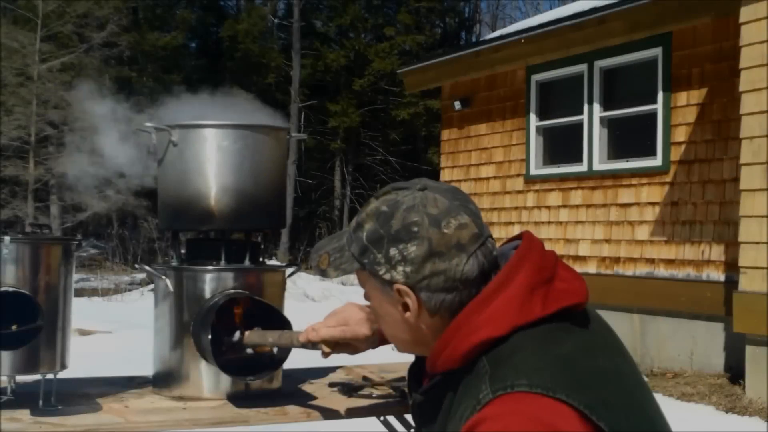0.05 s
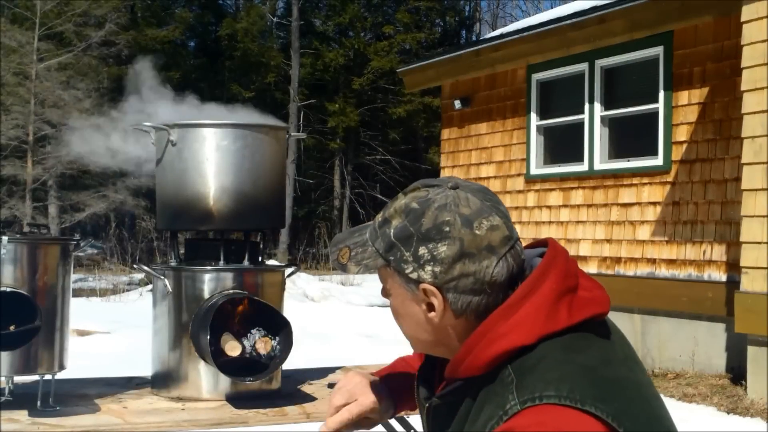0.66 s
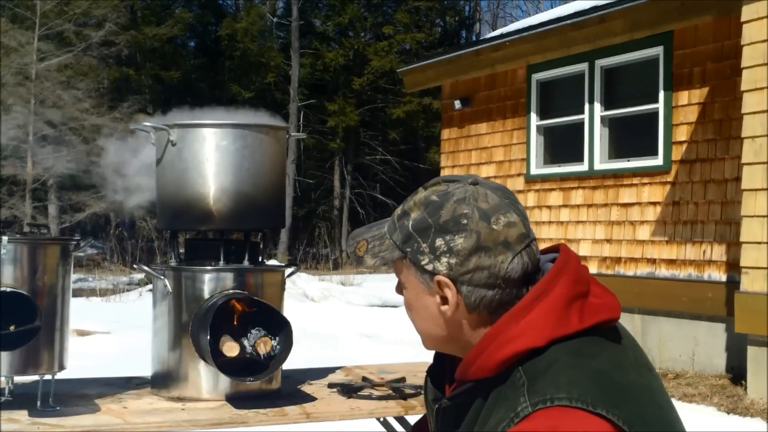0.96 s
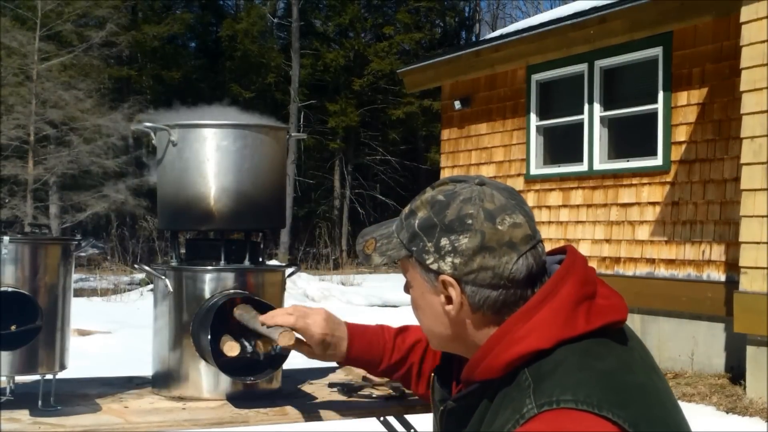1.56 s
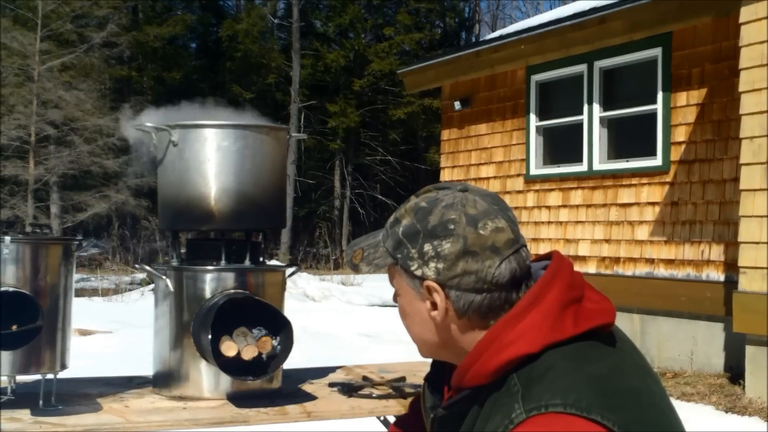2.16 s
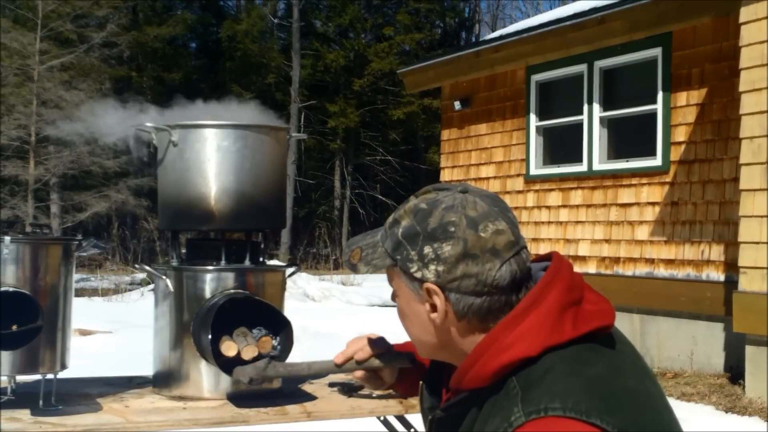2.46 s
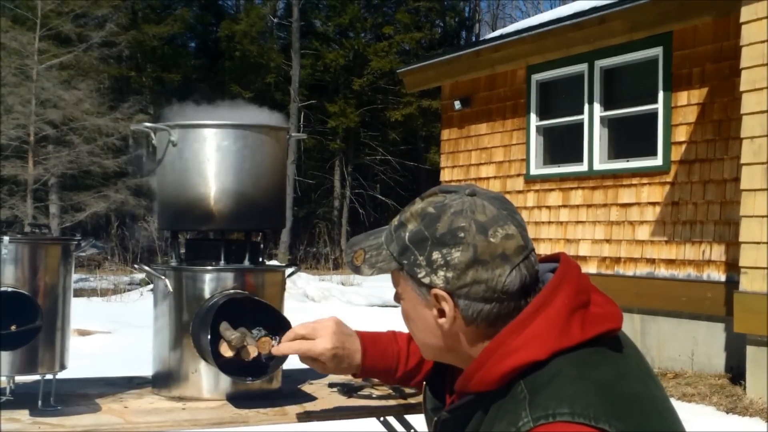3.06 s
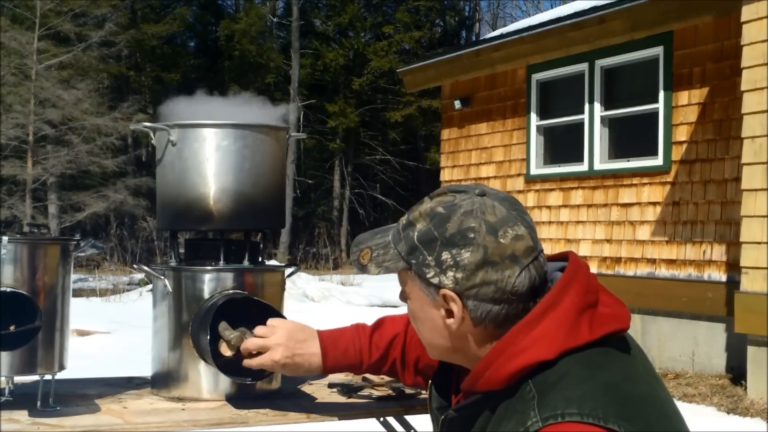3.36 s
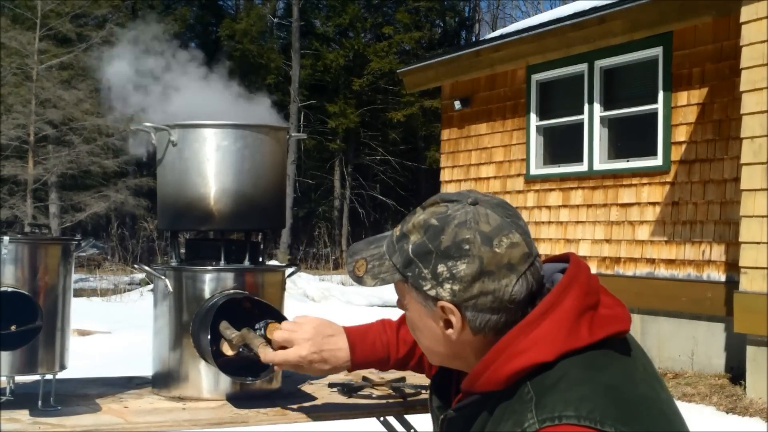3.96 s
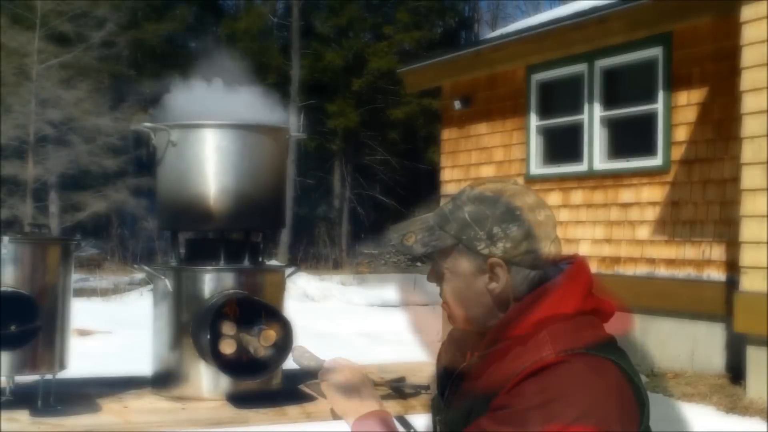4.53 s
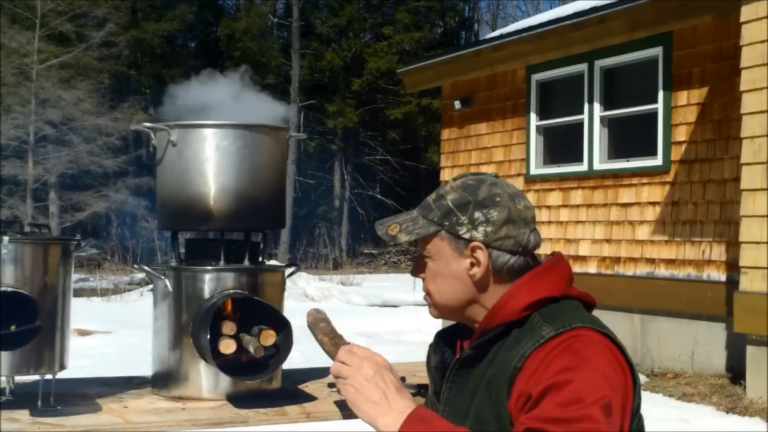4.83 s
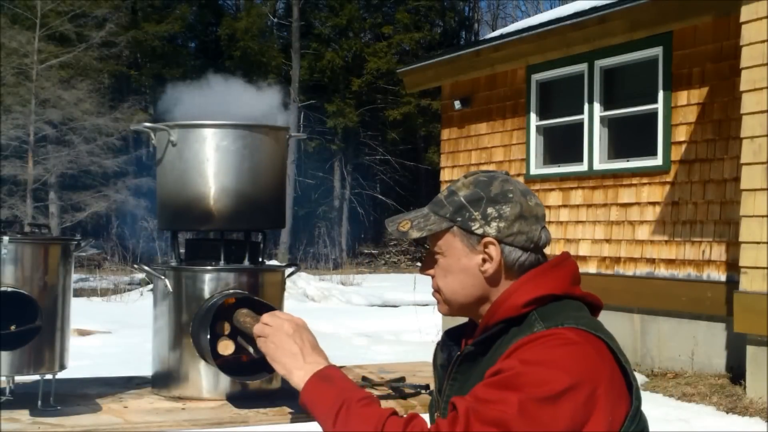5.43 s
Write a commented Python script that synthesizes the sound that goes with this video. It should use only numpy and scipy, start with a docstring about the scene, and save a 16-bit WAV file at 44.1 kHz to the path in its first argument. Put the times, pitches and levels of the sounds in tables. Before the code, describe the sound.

Sticks knock and scrape into a steel stove outdoors while the fire snaps and hisses, with faint bird chirps and wind on the microphone.

```python
"""Feeding a wood stove outdoors

Sticks knock and scrape into the stove's steel mouth: bark crunches, wood thuds, the feed tube rings.
Gas pockets snap in the fire and echo off a house wall; damp wood hisses and ticks over the draught.
A small bird gives thin, high calls among the trees, and gusts buffet the microphone."""
import sys
import numpy as np
from scipy import signal
from scipy.fft import rfft, irfft
from scipy.io import wavfile
from scipy.ndimage import uniform_filter1d

SR = 44100
rng = np.random.default_rng(int(sys.argv[2]) if len(sys.argv) > 2 else 0)


def dump_mix(stems):
    """Bounce the given channels to the path in sys.argv[1] as a 16-bit WAV at rate SR."""
    frames = np.atleast_2d(stems).T  # one column per channel
    limited = np.clip(frames, -1, 1)  # hard clip at full scale
    pcm = np.round(limited * 32767).astype(np.int16)
    wavfile.write(sys.argv[1], SR, pcm)


N = 250876
T = np.arange(N) / SR
# tone of crushed or rubbed bark: f/Hz, relative level/dB
BARK_SPECTRUM = [(150, -1), (400, -31), (1000, -8), (2800, -4), (5000, 2.5), (8000, 8.5), (11500, 4.5),
                 (16000, -11)]


def knocks(rise_s=0.0015, settle_db=-18, settle_s=0.013, wood_db=-7.5, steel_db=-13, breadth=1.2):
    """Each blow crushes bark, thuds dully in the wood and rings the tube."""
    # blows: t/s, crunch level/dB, push on wood and steel re crunch/dB, thud f/Hz,
    # lead of the tip's first touch/s, rocking decay/s
    blows = [(.06, -43, -8, 1300, 0, 0.015), (0.229, -43, 3.5, 1020, 0, .01),
             (0.346, -23, -7, 1200, .0195, .008), (.7043, -35.5, 3.5, 2730, 0, 0.01),
             (.721, -39.5, 14, 455, 0.0006, 0.0086), (0.7727, -27.5, -25, 1200, 0, 0.0089),
             (.787, -21, -11.5, 1180, 0, 0.037), (.977, -28.5, -0.5, 1030, 0.0008, .045),
             (1.024, -42, 3, 900, 0, 0.013), (1.9019, -20.5, -5.5, 920, 0, 0.065),
             (2.985, -41, -9, 1200, 0, .01), (3.144, -36, 2.5, 616, 0.0011, 0.071),
             (3.178, -39, 4, 749, 0.0018, .035), (3.2073, -22, 1, 944.3, .005, 0.026),
             (3.249, -42.5, 7.5, 340, 0, .045), (3.294, -41, 7.5, 414, 0.0033, 0.048),
             (3.946, -30, -8.5, 910, 0.046, 0.089), (5.549, -30.5, 4, 840, 0.0097, 0.023)]
    crunch, body = np.zeros((2, N))
    t = T[:SR // 8]
    attack = 1 - np.exp(-t / rise_s)
    for s, db, push_db, hz, lead_s, rock_s in blows:
        ring = feed_tube(hz)
        ring[:len(t)] *= attack
        for delay_s, force_db, decay_s, dull_db in contacts(lead_s, rock_s):
            # loose bark and embers settle after each contact
            settling = undb(settle_db) * (1 - np.exp(-t / decay_s)) * np.exp(-t / settle_s)
            contact = attack * np.exp(-t / decay_s) + settling
            wood = band(rng.standard_normal(len(t)), hz, 2 * hz)
            thud = unit(band(wood, hz, breadth * hz)) * contact
            add(crunch, s + delay_s, undb(db + force_db) * contact)
            add(body, s + delay_s, undb(db + force_db + push_db + wood_db + dull_db) * thud)
            add(body, s + delay_s, undb(db + force_db + push_db + steel_db) * ring)
    return colour(grit(spread_db=1.0) * crunch, BARK_SPECTRUM) + body


def contacts(lead_s, rock_s, firm_s=0.0088, soft_s=0.01, touch_db=-6.5,
             gap_s=.022, rebound_db=-8, dull_db=6, count=5):
    """A stick touches, hits and rocks to rest. Rows: delay/s, force/dB, decay/s, extra thud/dB."""
    touch = [(-lead_s, touch_db, firm_s, touch_db)] if lead_s > 0 else []
    impact = [(0.00028, 0, firm_s, 0)]
    delays = gap_s * np.cumsum(1 + .12 * rng.standard_normal(count))
    rebounds = [(d, rebound_db - 20 / np.log(10) * d / rock_s, soft_s, dull_db) for d in delays]
    return touch + impact + rebounds


def feed_tube(push_hz, place_db=3.5, detune=0.011, focus=1.08):
    """The steel rings most near the pitch of the push; each contact point weights the modes anew."""
    # modes of the tube and the sticks lying in it: f/Hz, relative level/dB, t60/s
    modes = [(265, -3, 0.3), (337, -1.5, .36), (360, 0.5, 0.13), (394.3, 2, 0.3), (576, -3, 0.057),
             (787, -4.5, 0.22), (842, 4, 0.058), (930, 0.5, 0.082), (990, -30, 0.015), (1256, -6, 0.12),
             (1634, -3, 0.11), (2000, -5, 0.14), (2426, 0, 0.091), (2520, -5, 0.075), (3600, -4, 0.23),
             (4340, -13, 0.11), (6500, 9, .06)]
    t = T[:SR // 3]
    ring = 0
    for (hz, db, t60), (weight, shift, phase) in zip(modes, rng.standard_normal((len(modes), 3))):
        reach = 1 / np.hypot(1, focus * (hz / push_hz - push_hz / hz))
        envelope = reach * undb(db + place_db * weight - 60 * t / t60)
        ring += envelope * np.sin(2 * np.pi * (hz * (1 + detune * shift) * t + phase))
    return ring / np.sqrt(np.mean(ring[:SR // 60] ** 2))


def scrapes(catch_db=3.0):
    """A stick sliding over bark and steel catches and lets go; the rasp wakes its resonances."""
    # slides: t/s, length/s, level/dB, squeal drive re rasp/dB
    slides = [(0.846, .052, -53, -6), (0.931, 0.046, -39.5, -9), (1.442, 0.073, -42, -10),
              (1.913, 0.07, -35, -1), (2.341, 0.17, -49, 3), (3.211, 0.02, -34, -3),
              (3.532, 0.4, -53.5, -12), (4.237, 0.083, -50.5, -10), (4.55, 0.077, -44.5, 5),
              (4.605, .04, -42, -5), (4.803, 0.082, -45.5, -4), (5.484, 0.046, -42, 9.5),
              (5.571, 0.056, -48.5, -8)]
    # resonances of a rubbed stick: f/Hz, width/Hz, gain/dB
    stick_modes = [(890, 170, -1), (1660, 89, -6), (3045, 45, 3), (4640, 81, -3), (5140, 110, 0)]
    pressure, squeal = np.zeros((2, N))
    for s, length_s, db, squeal_db in slides:
        progress = np.linspace(0, 1, int(length_s * SR))
        stroke = undb(db) * np.abs(np.sin(np.pi * progress ** 0.55))
        add(pressure, s, stroke)
        add(squeal, s, undb(squeal_db) * stroke)
    rasp = grit(spread_db=-2.0) * undb(catch_db * wander(170))
    ring = sum(undb(db) * band(rasp * squeal, hz, width_hz) for hz, width_hz, db in stick_modes)
    return colour(rasp * pressure, BARK_SPECTRUM) + ring


def snaps(burst_cycles=11, rattle_db=-22, rattle_s=0.011, spread=2.5, spray_db=-13.5, spray_growth=0.7):
    """A gas pocket bursts: one pressure swing, a spray of splinters, a short rattle round the firebox."""
    # bursts: t/s, swing peak before the low cut/dB, f/Hz, low cut/Hz; the last row is no new pocket but the
    # loud slap of the 5.654 s burst off the house wall
    bursts = [(0.085, -22, 11000, 6100), (0.593, -3.5, 5700, 553), (0.8792, -19.5, 6570, 1500),
              (1.2962, -8.5, 9250, 6300), (1.6464, -21, 12400, 6600), (1.852, -23, 11000, 6000),
              (2.196, -21.5, 9193, 6000), (3.4, -25.5, 6900, 4960), (4.113, -27, 7060, 603),
              (4.684, -20.5, 9100, 1500), (5.121, -21.5, 11100, 5000), (5.212, -25.5, 11220, 5030),
              (5.5323, -19, 10500, 4502), (5.6542, -1.5, 5230, 390), (5.672, -13, 8500, 5010)]
    out = np.zeros(N)
    t = T[:SR // 20]
    for s, db, hz, lowest_hz in bursts:
        phase = np.pi * hz * (t - 8 / SR)
        swing = phase * np.exp((1 - 2 * phase * phase) / 2) * np.sqrt(2)
        splinters = band(rng.standard_normal(len(t)), hz, spread * hz)
        envelope = np.exp(-t * hz / burst_cycles) + undb(rattle_db) * np.exp(-t / rattle_s)
        spray = unit(band(splinters, hz, 2 * spread * hz)) * envelope * (phase > 0)
        snap = undb(db) * swing + undb(spray_db + spray_growth * db) * spray
        # small pockets radiate little bass
        low_cut = signal.butter(3, lowest_hz, "high", fs=SR, output="sos")
        add(out, s, signal.sosfilt(low_cut, snap))
    return out


def wall_echo(x, delay_s=.019, echo_db=-22):
    """A sound plus its slap off the house wall, smeared by the shingles."""
    out = x.copy()
    add(out, delay_s, undb(echo_db) * scatter(x, decay_s=.003, size=SR // 40))
    return out


def hiss(ticks_per_s=32, tick_db=-9.5, tick_s=.0009, unevenness_db=5, trim_db=1.5):
    """Damp wood sizzles and ticks finely as it burns."""
    # swell of the hiss: t/s, level before trim/dB
    flames = [(0.0, -55), (0.77, -52.5), (0.91, -51), (1.49, -54.5), (1.72, -54), (1.96, -52), (2.83, -54),
              (3.55, -54.5), (3.84, -52.5), (4.26, -56), (4.55, -52.5), (4.73, -49), (5.15, -57.5),
              (5.45, -57), (5.56, -52), (5.62, -58)]
    # tone of the hiss: f/Hz, relative level/dB
    spectrum = [(500, 7), (2000, 2.5), (4500, 1.5), (6500, 3.5), (8400, 7), (10000, -0.5), (11500, 6.5),
                (13500, 0), (16000, -4)]
    sizes = undb(unevenness_db * np.minimum(rng.exponential(size=N), 2))
    ticks = (rng.random(N) < ticks_per_s / SR) * sizes
    fading = signal.lfilter([1], [1, -np.exp(-1 / (tick_s * SR))], ticks)
    crackle = unit(band(fading * rng.standard_normal(N), hz=10600, width_hz=6400))
    sizzle = grit(spread_db=1.5) * undb(.8 * wander(25))
    return colour(sizzle + undb(tick_db) * crackle, spectrum) * undb(trim_db + curve(flames))


def draught(rush_db=-50, waver_db=1.9, flue_db=-62):
    """Air drawn through the stove rushes softly, and the flue hums."""
    # tone of the rush: f/Hz, relative level/dB
    spectrum = [(25, 3), (60, -3), (130, -15), (200, -13.5), (300, -9.5), (500, -20.5), (850, -24),
                (1300, -26.5), (2100, -26), (4000, -42.5), (9000, -79)]
    rush = colour(rng.standard_normal(N), spectrum) * undb(rush_db + waver_db * wander(9.9))
    hum = undb(flue_db) * unit(band(rng.standard_normal(N), hz=280, width_hz=76))
    return rush + hum


def bird(waver=.007, trees_db=-21, trees_s=0.1):
    """Thin arched whistles, scattered by the trees."""
    # notes, two overlapping in the full calls: t/s, length/s, top f/Hz, level at strength 1/dB
    notes = [(2.578, 0.037, 8180, -43), (2.773, 0.051, 7540, -36), (2.791, 0.049, 7620, -33.5),
             (3.24, 0.04, 8100, -44), (5.36, 0.047, 7430, -30), (5.383, 0.052, 7510, -30.5)]
    # arch of one note: share of its length, share of its top pitch, strength 0-1
    arch = [(0, 0.73, 0.01), (.09, 0.887, 0.19), (.3, 0.96, 0.77), (.6, 0.96, .85), (.8, 1, .9),
            (.9, .97, .25), (1, 0.65, 0.08)]
    out = np.zeros(N)
    share, pitch, strength = np.transpose(arch)
    tremble = 1 + waver * wander(400)
    for s, length_s, top_hz, db in notes:
        progress = np.linspace(0, 1, int(length_s * SR))
        hz = top_hz * np.interp(progress, share, pitch) * tremble[int(s * SR):][:len(progress)]
        whistle = np.sqrt(2) * np.sin(2 * np.pi * np.cumsum(hz) / SR)
        add(out, s, undb(db) * np.interp(progress, share, strength) * whistle)
    return out + undb(trees_db) * scatter(out, trees_s, size=SR // 3)[:N]


def wind(swirl_hz=42, flutter_hz=95, swirl_db=-3.5, flutter_db=-13.5, gusty_db=3):
    """Breeze and gusts play on the microphone: a deep swirl with a lighter flutter above it."""
    # the breeze blows, lulls and picks up: t/s, strength/dB
    breeze = [(0, -33), (.6, -34), (.8, -38), (1.3, -38.5), (2.0, -42.5), (2.45, -36.5), (2.6, -51.5),
              (3.35, -48.5), (3.8, -41.5), (4.4, -48.5), (4.7, -41.5), (5.69, -43)]
    # gusts on top of it: t/s, length/s, peak strength/dB
    gusts = [(0.338, .2, -26.5), (0.47, 0.073, -31), (1.093, 0.081, -31), (1.287, 0.11, -31),
             (1.72, 0.12, -32.5), (1.877, 0.064, -31), (2.162, 0.066, -27.5), (2.317, 0.15, -29.5),
             (3.669, 0.22, -35), (4.095, .13, -27)]
    gust_power = sum(undb(db) ** 2 * np.exp(-2 * (2 * (T - s) / length_s) ** 2)
                     for s, length_s, db in gusts)
    strength = np.sqrt(undb(curve(breeze)) ** 2 + gust_power)
    swirl = undb(swirl_db) * eddies(swirl_hz, breadth=1.78)
    flutter = undb(flutter_db) * eddies(flutter_hz, breadth=0.85)
    return strength * (swirl + flutter) * undb(gusty_db * wander(28))


def buffets():
    """Single eddies thump the microphone."""
    # thumps: centre t/s, length/s, f/Hz, level/dB
    thumps = [(.327, 0.046, 132.4, -20), (0.413, 0.11, 126, -31), (1.404, 0.015, 153, -40),
              (1.8, 0.013, 139, -37), (2.282, .025, 132, -27.5), (3.72, 0.019, 99.9, -38.5),
              (4.047, 0.023, 82.5, -29), (4.126, 0.036, 90.4, -34.5), (4.536, 0.077, 138, -44.5),
              (5.556, 0.052, 191, -41)]
    out = np.zeros(N)
    t = T[:SR // 2] - .25
    for s, length_s, hz, db in thumps:
        swell = undb(db) * np.exp(-(2 * t / length_s) ** 2)
        add(out, s + t[0], swell * eddies(hz, breadth=0.83, size=len(t)))
    return out


def eddies(hz, breadth, size=N):
    """Turbulence around one frequency, its slow swells evened out."""
    x = band(band(rng.standard_normal(size), hz, breadth * hz), hz, breadth * hz)
    x = signal.sosfilt(signal.butter(4, 1.39 * hz + 30, fs=SR, output="sos"), x)
    return x / np.sqrt(uniform_filter1d(x ** 2, int(3 * SR / hz)))


def grit(spread_db):
    """Dense tiny fractures of uneven strength."""
    return unit(rng.standard_normal(N) * undb(spread_db * wander(1500)))


def scatter(x, decay_s, size):
    """Many small reflections smear a sound into a fading tail."""
    tail = rng.standard_normal(size) * np.exp(-T[:size] / decay_s)
    return signal.fftconvolve(x, tail / np.linalg.norm(tail))


def wander(rate_hz):
    """Random drift with rms 1."""
    hold = int(SR / rate_hz)
    steps = np.repeat(rng.standard_normal(N // hold + 1), hold)
    return unit(uniform_filter1d(steps, hold)[:N])


def band(x, hz, width_hz):
    """One resonance, gain 1 at its centre."""
    g, k = np.tan(np.pi * min(hz / SR, .45)), width_hz / hz
    return signal.lfilter([g * k, 0, -g * k], [1 + g * k + g * g, 2 * g * g - 2, 1 - g * k + g * g], x)


def colour(x, spectrum, size=4096):
    """Minimum-phase EQ with the given spectrum; white noise keeps its power."""
    hz, db = np.transpose(spectrum)
    gain = undb(np.interp(np.log(np.fft.rfftfreq(size, 1 / SR) + 1), np.log(hz), db))
    cepstrum = irfft(np.log(gain))
    cepstrum[1:size // 2] *= 2
    cepstrum[size // 2 + 1:] = 0
    response = irfft(np.exp(rfft(cepstrum)))
    return signal.fftconvolve(x, response / np.linalg.norm(response))[:N]


def undb(db):
    """Decibels to gain."""
    return 10 ** (np.asarray(db) / 20)


def unit(x):
    """Scale to rms 1."""
    return x / np.sqrt(np.mean(x ** 2))


def curve(rows):
    """Join (t/s, value) rows by straight lines."""
    return np.interp(T, *np.transpose(rows))


def add(out, s, x):
    """Mix x into out from time s on."""
    i = max(int(s * SR), 0)
    out[i:i + len(x)] += x[:max(N - i, 0)]


def scene():
    """Sticks, fire, bird and wind in the open air, in mono."""
    sticks = knocks() + scrapes()
    fire = wall_echo(snaps()) + hiss() + draught()
    return (sticks + fire + bird() + wind() + buffets())[None]


def record(dry):
    """Peaks flatten at full scale, then a steep high cut takes off the top."""
    top_hz = 16000
    high_cut = signal.ellip(8, .1, 80, top_hz, fs=SR, output="sos")
    return signal.sosfilt(high_cut, np.clip(dry, -1, 1))


dry = scene()
out = record(dry)
dump_mix(out)
```